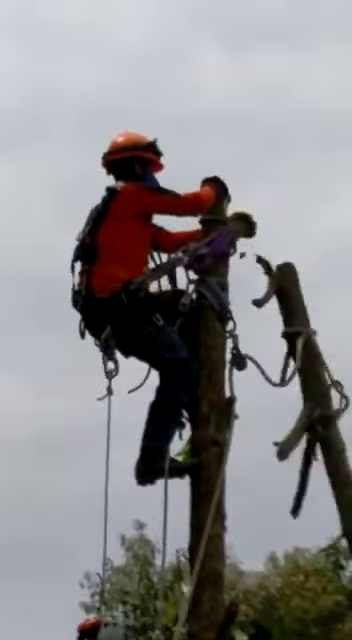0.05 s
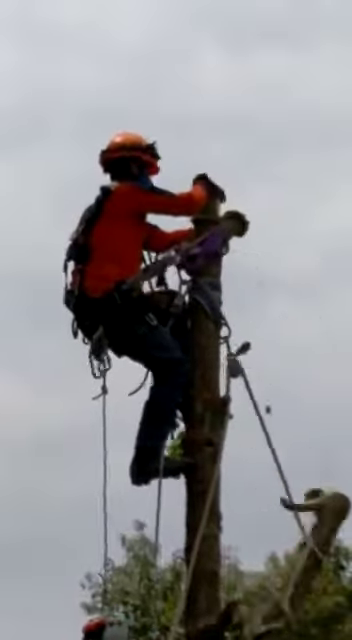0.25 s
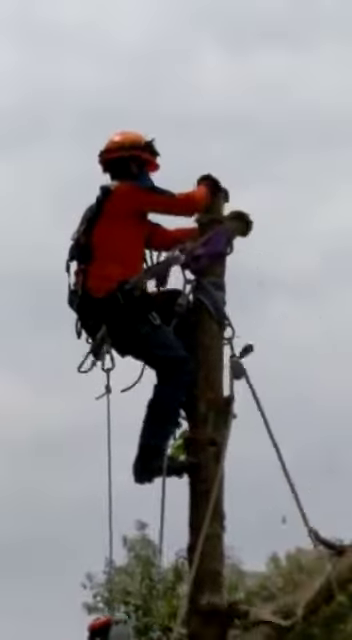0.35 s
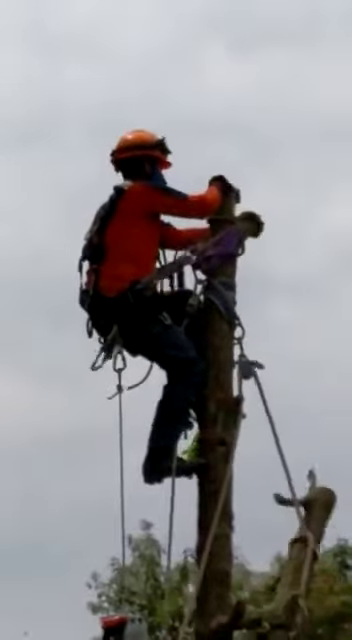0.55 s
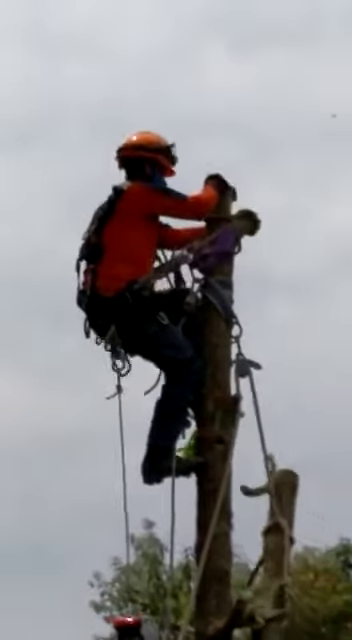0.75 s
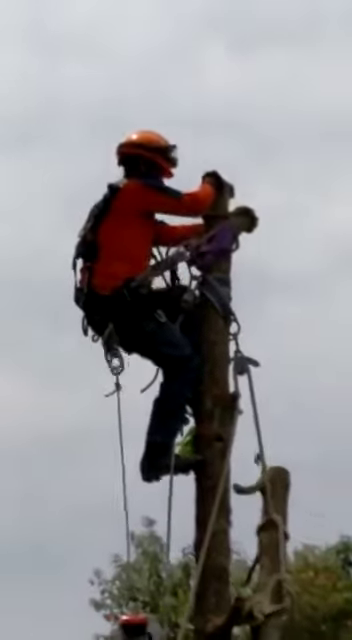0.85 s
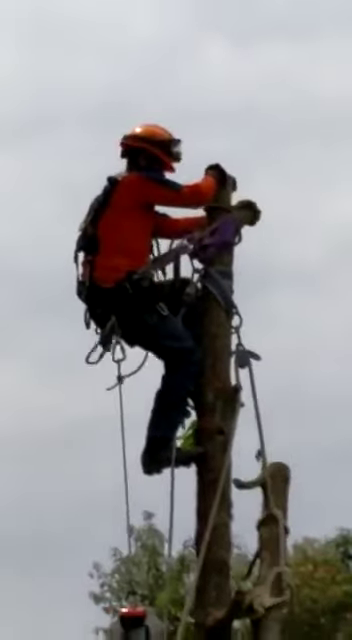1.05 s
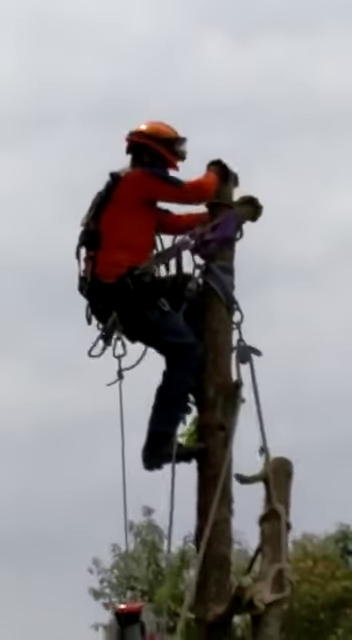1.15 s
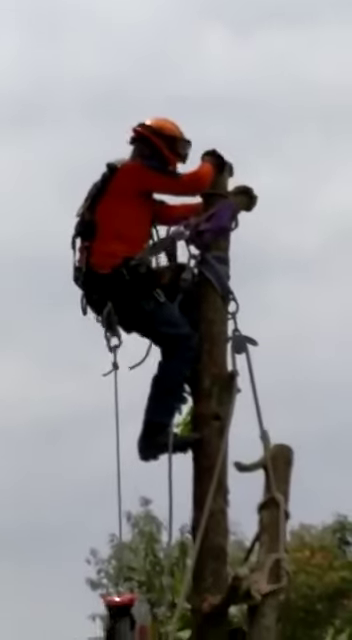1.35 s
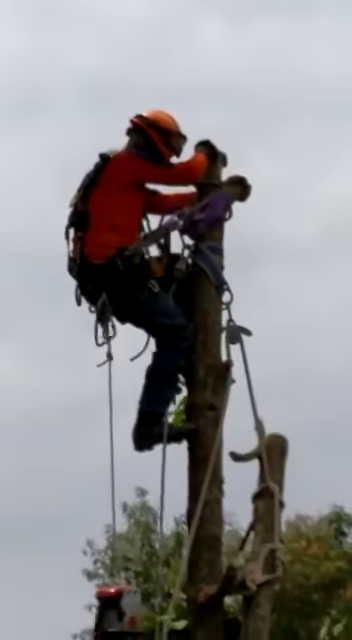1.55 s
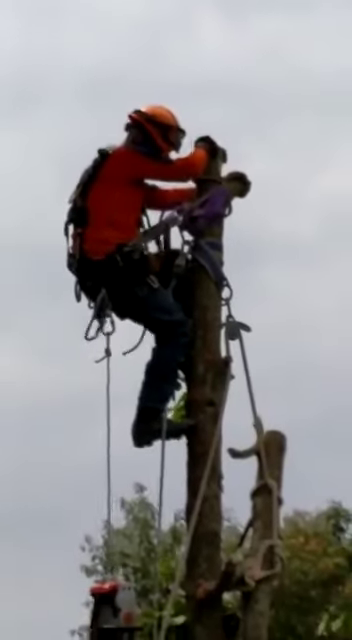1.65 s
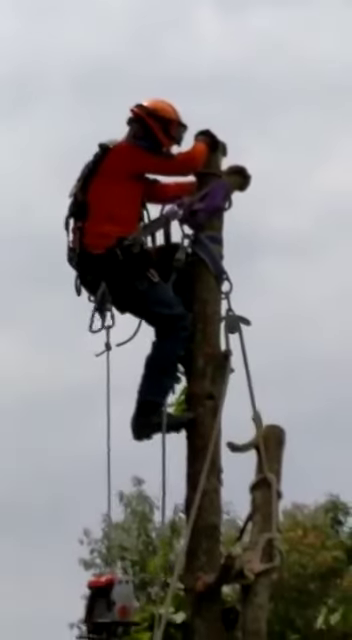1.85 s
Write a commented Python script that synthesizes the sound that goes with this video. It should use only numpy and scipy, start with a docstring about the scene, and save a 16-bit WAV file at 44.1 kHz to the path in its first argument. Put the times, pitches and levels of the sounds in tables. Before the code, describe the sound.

One sharp wooden crack of a roped limb hitting a trunk, with light scraping and wind.

```python
"""In light wind and leaf hiss, a cut limb swings down on its scraping rope and bumps softly.
At 0.28 s it cracks against the trunk: a snap, crushed bark, a low shudder, ringing wood and rigging.
The garden throws the crack back while the limb judders. As it settles, bark and rope scrape in runs
of tiny slips and metal climbing gear clinks. Near the end a faint low tone wavers."""
import sys
import numpy as np
from scipy import signal
from scipy.fft import rfft, irfft
from scipy.io import wavfile
from scipy.ndimage import uniform_filter1d

SR = 44100
rng = np.random.default_rng(int(sys.argv[2]) if len(sys.argv) > 2 else 0)


def materialize(psi):
    """Save the field psi as 16-bit PCM at rate SR to the path in sys.argv[1].

    A 1-D psi becomes a single channel; in a 2-D psi each row is a channel.
    """
    bounded = np.clip(np.atleast_2d(psi).T, -1, 1)
    quanta = np.round(bounded * 32767).astype(np.int16)
    wavfile.write(sys.argv[1], SR, quanta)


N = 83790
CRACK_S = 0.2801

# The tones that struck wood rings with (its modes): f/Hz, level/dB, time to fade by 60 dB (t60)/s
WOOD_MODES = [(250, -33, .25), (320, -28.5, .25), (458, -27, .24), (600, -31, .1), (750, -24, .12),
              (834, -24, .2), (1034, -21, .12), (1190, -23, .08), (1284, -25, .13), (1470, -18, .07),
              (1538, -19, .1), (1635, -19, .07), (1745, -24, .1), (1981, -14, .07), (2100, -21, .05),
              (2210, -18, .06), (2400, -22, .05), (2560, -22, .05), (2870, -22, .06)]
# Tone colour of crushed bark: f/Hz, level/dB
CRUSHED_BARK = [(100, -30), (550, -9), (1050, -1.5), (1950, 2), (2900, -1), (3800, -3.5), (5800, -7),
                (8800, -1.5), (11500, -9), (13000, -18), (16000, -75)]


def amp(db):
    """Turns decibels into a gain."""
    return 10 ** (np.asarray(db) / 20)


def unit(x):
    """Scales a signal to an average strength (rms) of 1."""
    return x / np.sqrt(np.mean(x ** 2) + 1e-20)


def read(points, hz):
    """Looks up a table between its rows, on a log-frequency axis."""
    f, value = np.transpose(points)
    return np.interp(np.log(hz + 1), np.log(f + 1), value)


def pan(db):
    """Two gains that make the left side db louder than the right."""
    return amp(np.array([[db], [-db]]) / 2)


def since(start):
    """Seconds since a moment, zero before it."""
    return np.maximum(np.arange(N) / SR - start, 0)


def fade(t, t60):
    """Falls by 60 dB every t60 seconds."""
    return np.exp(-np.log(1000) * t / t60)


def swell(start, length):
    """The level rises and falls in one smooth arch."""
    return np.sin(np.pi * np.minimum(since(start) / length, 1))


def stroke(start, length, rise_s=0.00088, release_t60=0.041):
    """The level rises quickly, holds, then fades."""
    return np.minimum(since(start) / rise_s, 1) * fade(since(start + length), release_t60)


def convolve(x, taps):
    """Filters each channel and keeps the scene's length."""
    return signal.fftconvolve(np.atleast_2d(x), np.atleast_2d(taps), axes=1)[:, :N]


def colour(*tables):
    """A short click of energy 1, used as a filter; its tone colour is the sum of the dB tables."""
    hz = abs(np.fft.fftfreq(4096, 1 / SR))
    log_gain = np.log(amp(sum(read(table, hz) for table in tables)))
    spectrum = np.exp(np.conj(signal.hilbert(log_gain)))  # minimum phase: the energy comes early
    taps = np.fft.ifft(spectrum).real[:len(hz) // 2]
    return taps / np.linalg.norm(taps)


def pair(a, b, likeness):
    """Mixes two unrelated signals into left and right; likeness 1 makes both sides equal."""
    likeness = np.clip(likeness, -1, 1)
    mid, side = a * np.sqrt((1 + likeness) / 2), b * np.sqrt((1 - likeness) / 2)
    return np.array([mid + side, mid - side])


def slips(per_s=9000, spread_db=1):
    """Rough surfaces catch and slip: a dense stream of tiny, uneven stereo clicks."""
    size = amp(spread_db * np.minimum(rng.exponential(1, (2, N)), 4))
    clicks = size * rng.choice([-1, 1], (2, N)) * (rng.random((2, N)) < per_s / SR)
    return unit(pair(*clicks, likeness=0.073))


def contacts(per_s):
    """Loose parts touch at random: scattered stereo clicks of uneven size."""
    return rng.standard_normal((2, N)) * (rng.random(N) < per_s / SR)


def ring(modes, start, rise_cycles=0.012):
    """A struck object rings with fading tones; low ones take longer to build up."""
    t = since(start)
    out = np.zeros(N)
    for hz, db, t60 in modes:
        rise = 1 - np.exp(-hz * t / rise_cycles)
        out += amp(db) * rise * fade(t, t60) * np.sin(2 * np.pi * hz * t)
    return out


def air(level_db=-50, patchy_db=2):
    """Distant rumble and leaf hiss: noise whose level drifts in patches."""
    # Tone colour of the background: f/Hz, level/dB
    air_colour = [(12, -35), (20, 2), (65, -0.5), (113, -9), (234, -6.5), (558, -13), (678, -10.5),
                  (2020, -15), (5680, -27), (6180, -33), (9670, -20), (10800, -29), (12100, -41),
                  (14300, -41), (16000, -62)]
    # How alike the two sides are: f/Hz, likeness from 0 to 1
    likeness = [(30, 0.55), (70, 1), (250, 0.95), (600, 0.67), (2000, 0.042), (10000, 0.079)]
    hz = np.fft.rfftfreq(1024, 1 / SR)
    a, b, c, d, patches = rng.standard_normal((5, N // 256 + 5, len(hz)))
    patches = unit(uniform_filter1d(uniform_filter1d(patches, size=12, axis=0), size=12, axis=1))
    noise = pair(a + 1j * b, c + 1j * d, read(likeness, hz))
    spectra = noise * amp(read(air_colour, hz) + patchy_db * patches)
    wash = signal.istft(spectra, nperseg=1024, noverlap=768, time_axis=1, freq_axis=2)[1][:, :N]
    return amp(level_db) * unit(wash) * pan(1.5)


def low_swells():
    """Short swells of deep noise: the trunk's low shudder at the crack, then soft puffs of wind."""
    # The trunk's shudder, then the puffs: t/s, length/s, level/dB
    swells = [(0.274, 0.073, -45.5), (0.642, 0.12, -54), (1.529, 0.033, -56), (1.777, 0.038, -55.5)]
    # Tone colour of a swell: f/Hz, level/dB
    swell_colour = [(20, -53), (55, 7), (110, 1.5), (200, -5.5), (600, -31), (4000, -69)]
    strength = sum(amp(db) * swell(start, length) for start, length, db in swells)
    return convolve(rng.standard_normal(N) * strength, colour(swell_colour))


def drone(start_s=1.535, length_s=0.21, start_hz=226, sag_hz_per_s=100, level_db=-53):
    """A faint low tone wavers in level and sinks in pitch."""
    hz = start_hz - sag_hz_per_s * since(start_s)
    tone = np.sin(2 * np.pi * np.cumsum(hz) / SR)
    waver = unit(uniform_filter1d(uniform_filter1d(rng.standard_normal(N), size=900), size=900))
    return amp(level_db) * swell(start_s, length_s) * (1 + 0.57 * waver) * tone


def garden(x, tail_db=-4, early_db=-4.5, blur_octaves=0.093, patchy_db=3.5):
    """Walls and leaves scatter the sound: early echoes, then a patchy tail that dies band by band."""
    # Tone colour of the echo: f/Hz, level/dB
    echo_colour = [(60, 4), (200, 4.5), (420, 1), (700, -4), (1100, -5.5), (1900, -0.5), (3800, -0.5),
                   (5600, -1), (9400, 5), (12100, 0), (12700, -28), (16000, -32)]
    # How long the echo lasts: f/Hz, t60/s
    echo_t60 = [(60, 4.2), (300, 0.96), (700, 0.94), (2000, 0.93), (5000, 1.17), (9000, 0.72),
                (14000, 0.38)]
    channels = np.vstack([x.mean(0), rng.standard_normal((2, N))])
    hz, t, spectra = signal.stft(channels, SR, nperseg=256, noverlap=192)
    source, noise = spectra[0], spectra[1:]
    octaves_apart = np.log2((hz[:, None] + hz[1]) / (hz + hz[1]))
    blur = np.exp(-(octaves_apart / blur_octaves) ** 2 / 2)
    power = blur / blur.sum(1, keepdims=True) @ abs(source) ** 2
    tail = fade(t, read(echo_t60, hz)[:, None]) ** 2 * np.clip(t / 0.0026 - 1, 0, 1)  # after 2.6 ms
    early = np.sin(np.pi * np.clip((t - 0.012) / 0.044, 0, 1))  # nearby trees and walls, 12 to 56 ms
    answer = amp(tail_db) ** 2 * tail / tail.sum(1).mean() + amp(early_db) ** 2 * early / early.sum()
    echo_power = abs(signal.fftconvolve(power, answer, axes=1)[:, :len(t)])
    level = np.sqrt(echo_power) * unit(amp(read(echo_colour, hz)))[:, None]
    patches = rng.standard_normal(level.shape)
    patches = unit(uniform_filter1d(uniform_filter1d(patches, size=2, axis=0), size=20, axis=1))
    echo = noise / np.std(noise) * level * amp(patchy_db * patches)
    return signal.istft(echo, SR, nperseg=256, noverlap=192)[1][:, :N]


def scrapes():
    """Bark and rope scrape in short runs of slips, each with its own rasp and fizz."""
    # Scrapes: t/s, length/s, level/dB, rasp near 2 kHz/dB, fizz near 9 kHz/dB
    runs = [(0.0, 0.059, -38, 4.5, 1), (0.057, 0.1, -51, 8.5, 0.5), (0.174, 0.011, -37, 10, 6),
            (0.204, 0.024, -33, 1.5, -4), (0.236, 0.13, -38, 10.5, -2), (0.405, 0.012, -32, 2, -4),
            (0.427, 0.0052, -33, 6, -10), (0.548, 0.021, -45.5, -32, -8), (0.635, 0.0092, -40, -3, -2),
            (0.703, 0.054, -40.5, 14, -3.5), (0.764, 0.0054, -41, 24, 19), (0.799, 0.029, -43.5, 2.5, -4.5),
            (0.841, 0.13, -54, 9.5, 1.5), (0.992, 0.014, -41, 5, 4), (1.016, 0.02, -47.5, 5, 1),
            (1.09, 0.043, -51.5, 2, 0), (1.257, 0.013, -37.5, -2, -5.5), (1.271, 0.0072, -44.5, -4, 23),
            (1.352, 0.01, -40.5, 15, -2.5), (1.5081, 0.0067, -36.5, -2, -7.5), (1.58, 0.029, -47, 5.5, -8),
            (1.652, 0.0082, -45.5, 8.5, -2), (1.827, 0.0086, -45, 0, 1)]
    # Tone colour that all scrapes share: f/Hz, level/dB
    scrape_colour = [(100, -28), (600, -11.5), (1300, -5.5), (2200, -1), (3300, -0.5), (3900, -4),
                     (4600, -1.5), (6000, -0.5), (8000, 2.5), (10500, 3.5), (11400, -8.5), (12200, -15),
                     (12800, -11.5), (16000, -40)]
    out = np.zeros((2, N))
    for start, length, db, rasp_db, fizz_db in runs:
        own_colour = [(2200, rasp_db), (4800, 0), (8500, fizz_db), (11500, fizz_db), (15000, 0)]
        out += amp(db) * convolve(slips() * stroke(start, length), colour(scrape_colour, own_colour))
    return out


def clinks(focus_octaves=0.29, rise_cycles=1.4, chatter_db=-8):
    """Metal climbing gear is struck, then chatters; each touch favours some of its tones."""
    # Touches of the gear: t/s, length/s, level/dB, f struck hardest/Hz
    touches = [(0.761, 0.0086, -38, 10000), (0.992, 0.023, -41.5, 3230), (0.997, 0.017, -40.5, 5700),
               (1.015, 0.015, -48, 3220), (1.258, 0.014, -41, 2810), (1.265, 0.0069, -39, 3270),
               (1.266, 0.008, -40, 11000), (1.347, 0.0074, -34, 5100), (1.35, 0.02, -39.5, 2100),
               (1.5105, 0.0074, -32.5, 10700), (1.511, 0.0037, -40.5, 3730), (1.83, 0.005, -49, 6800)]
    # Ringing tones of the gear: f/Hz, level/dB, t60/s
    gear_modes = [(1900, -3, .04), (2120, -1, .05), (2435, 1, .06), (2980, -3, .04), (3260, 0, .06),
                  (4450, -7, .03), (4780, 0, .035), (4960, -3, .04), (5260, -3, .03), (6270, -4, .04),
                  (9820, -3, .025), (10450, 0, .03), (11400, -6, .02), (12200, -5, .04)]
    out = np.zeros((2, N))
    for start, length, db, focus_hz in touches:
        modes = [(hz, mode_db - 6 * (np.log2(hz / focus_hz) / focus_octaves) ** 2, t60)
                 for hz, mode_db, t60 in gear_modes]
        chatter = convolve(contacts(per_s=860) * stroke(start, length), ring(modes, 0, rise_cycles))
        out += amp(db) * (ring(modes, start, rise_cycles) + amp(chatter_db) * chatter)
    return out


def rigging():
    """The steel rigging rings faintly when the limb hits."""
    # Ringing tones of the steel: f/Hz, level/dB, t60/s
    steel_modes = [(4896, -28.5, .25), (8080, -40, .25), (12938, -45, .58), (14062, -43.5, .5)]
    return ring(steel_modes, CRACK_S)


def bumps():
    """The limb makes soft, grinding contact just before the crack."""
    # Dull bumps: t/s, length/s, level/dB
    nudges = [(0.21, 0.016, -27.5), (0.252, 0.086, -43)]
    # Tone colour of a bump: f/Hz, level/dB
    bump_colour = [(60, -23), (220, -10), (365, 5), (480, -4.5), (660, 7.5), (900, -6.5), (1140, 3),
                   (1500, -13.5), (3000, -24), (8000, -33)]
    strength = sum(amp(db) * stroke(start, length) for start, length, db in nudges)
    return convolve(slips() * strength, colour(bump_colour))


def rattle(tick_db=-7, ring_db=-20.5):
    """After the crack the limb judders against the bark; each fading knock rings the wood again."""
    t = since(CRACK_S)
    knocks = np.tanh(contacts(per_s=130)) * (t > 0) * fade(t, t60=0.7)
    ticks = convolve(knocks, colour(CRUSHED_BARK, [(2200, -8), (7000, -7)]))
    ringing = convolve(knocks, ring(WOOD_MODES, 0))
    return amp(tick_db) * ticks + amp(ring_db) * ringing


def crack(wood_db=-4.5, snap_db=2, low_cut_hz=322):
    """The limb hits the trunk: a short ring of wood, one sharp snap and bursts of crushed bark."""
    # Tone colour of the snap: f/Hz, level/dB
    snap_colour = [(100, -8), (500, -12.5), (1100, -0.5), (1900, 8), (3200, -0.5), (5800, -19), (8500, -9),
                   (11000, -3), (15500, -17)]
    # Grinding contacts around the crack: t/s, t60/s, level/dB, treble/dB
    blows = [(0.2786, 0.031, -17, 1.5), (0.2807, 0.038, -12, 2.5), (0.286, 0.023, -21, 1)]
    out = amp(wood_db) * ring(WOOD_MODES, CRACK_S, rise_cycles=1.5) * pan(5.5)
    snap, at = colour(snap_colour), round(CRACK_S * SR)
    out[:, at:at + len(snap)] += amp(snap_db) * snap
    for start, t60, db, treble_db in blows:
        t = since(start)
        burst = slips() * (t > 0) * fade(t, t60)
        out += amp(db) * convolve(burst, colour(CRUSHED_BARK, [(2000, 0.015), (7000, treble_db)]))
    # The crack keeps little bass below about 300 Hz.
    return signal.sosfilt(signal.butter(2, low_cut_hz, "high", fs=SR, output="sos"), out)


def microphones(x):
    """A close pair: the bass is nearly the same on both sides, and the tree is louder on the left."""
    # Stereo width: f/Hz, gain of side against middle/dB
    width = [(40, -16), (130, -22), (260, -8), (500, -4.5), (950, 1.5), (15000, 0)]
    # Lean to the left: f/Hz, left minus right/dB
    balance = [(60, -1.5), (400, 0.5), (900, 3), (2000, 6), (3800, 3), (7500, -1.5), (11000, 3.5),
               (14000, 0)]
    hz = np.fft.rfftfreq(2 * N, 1 / SR)
    left, right = rfft(x, 2 * N)
    mid = (left + right) / 2
    side = (left - right) / 2 * amp(read(width, hz))
    lean = amp(read(balance, hz) / 2)
    return irfft(np.array([(mid + side) * lean, (mid - side) / lean]))[:, :N]


def scene():
    """Limb, rigging, echoes and wind together."""
    blow = crack()
    small_sounds = bumps() + rattle() + scrapes() + clinks()
    echoes = garden(blow + amp(-7.5) * small_sounds)
    return microphones(blow + small_sounds + rigging() + echoes) + air() + low_swells() + drone()


def record(dry, peak=0.88, top_hz=15800):
    """Clips the peak of the crack, then removes the highest treble."""
    clipped = np.clip(dry, -peak, peak)
    low_pass = signal.firwin(511, top_hz, window=("kaiser", 9), fs=SR)
    return signal.oaconvolve(clipped, low_pass[None], "same")


dry = scene()
out = record(dry)
materialize(out)
```